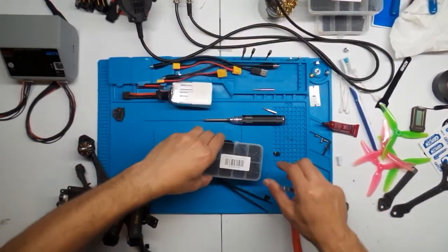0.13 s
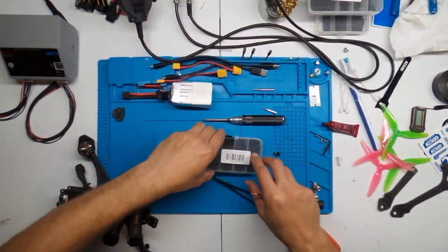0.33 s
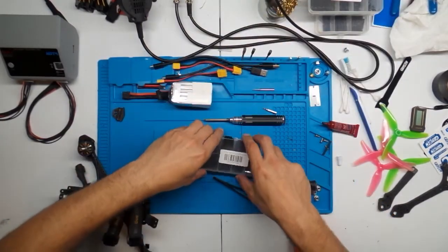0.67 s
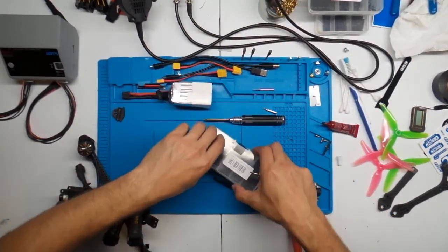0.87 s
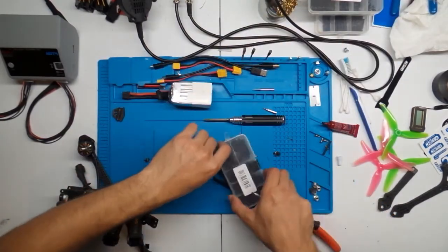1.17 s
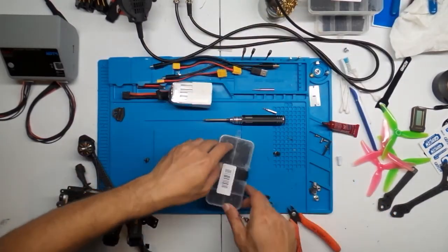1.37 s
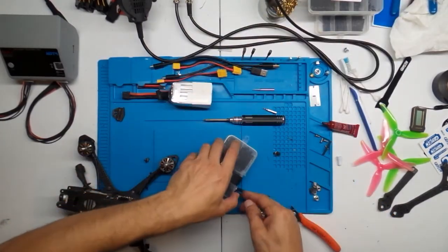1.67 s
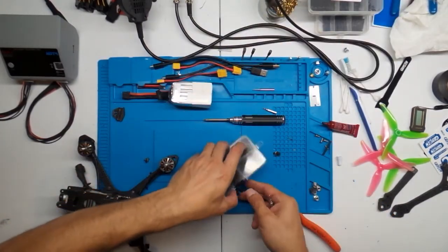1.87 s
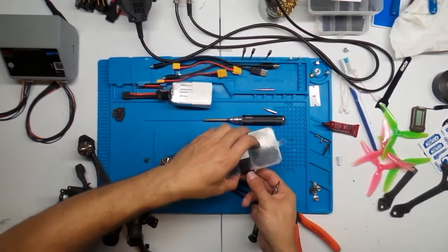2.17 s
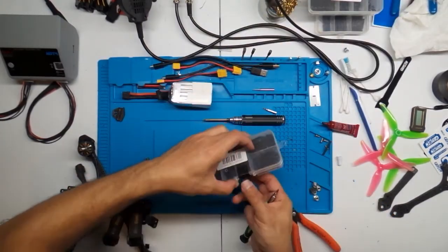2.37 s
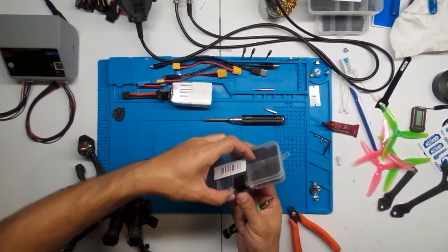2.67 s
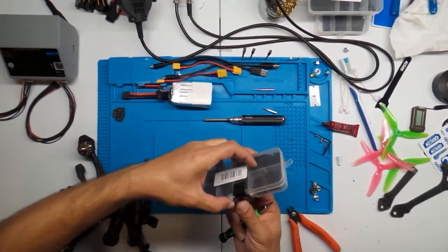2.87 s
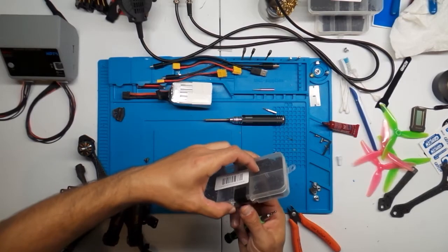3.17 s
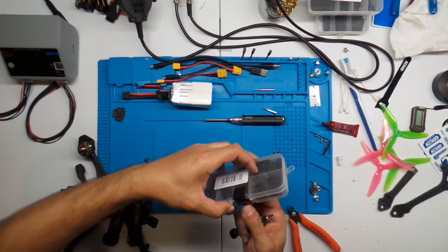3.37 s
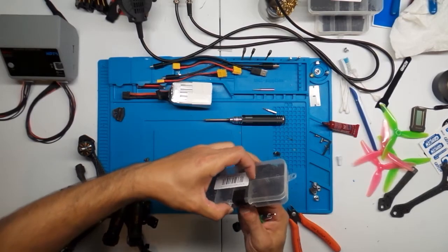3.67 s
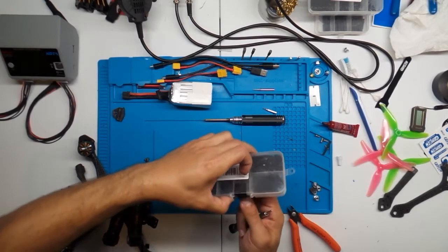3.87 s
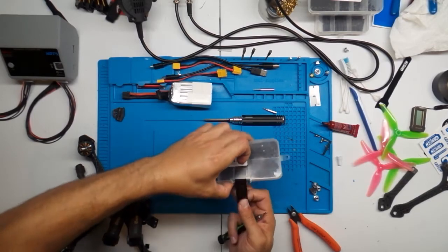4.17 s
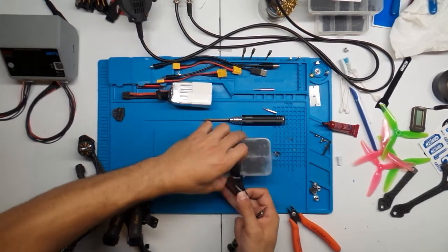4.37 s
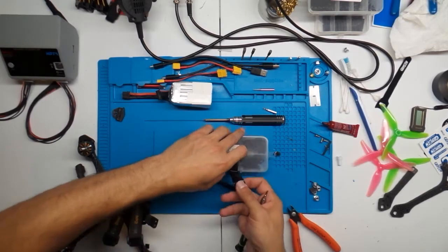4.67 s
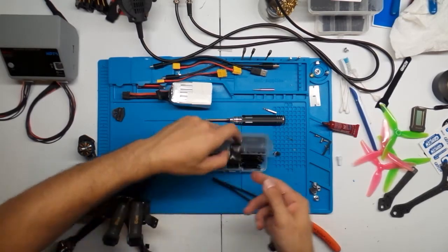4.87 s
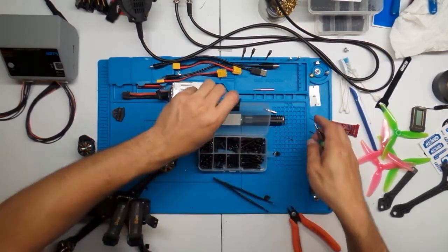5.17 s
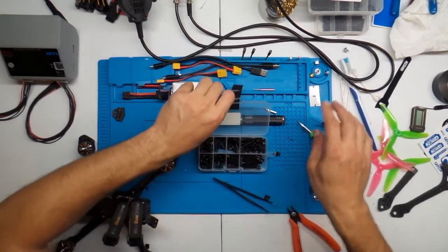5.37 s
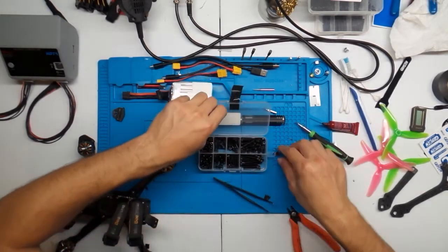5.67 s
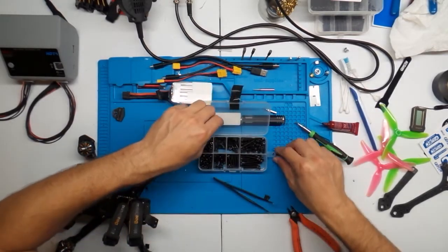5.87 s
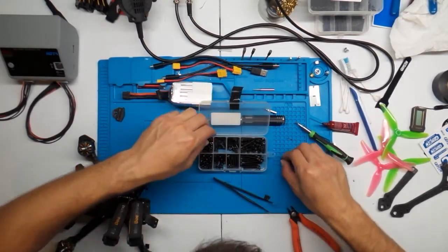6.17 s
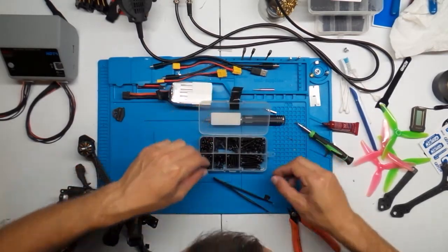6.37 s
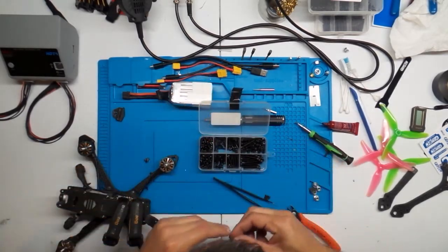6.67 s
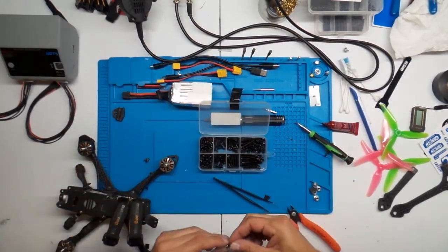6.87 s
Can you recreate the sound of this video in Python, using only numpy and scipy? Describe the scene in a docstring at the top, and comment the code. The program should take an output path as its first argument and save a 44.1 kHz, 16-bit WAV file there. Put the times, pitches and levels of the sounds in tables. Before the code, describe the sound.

Light plastic clicks, screw rattles and soft scrapes, then a hollow pop and a heavy clack as the box lands on the bench, fading to near silence.

```python
"""A click and a dull thud break the hush of a small room: a small plastic compartment box full of screws
is slid and turned on a rubber mat, picked up, unlatched, opened, then dropped onto the workbench.
Each contact is a noise burst or a shower of tiny impacts; it sounds directly and excites the shell's modes.
Landings drive decaying bench modes, stick-slip keeps damped resonances singing, and air pops ring briefly.
Dense decaying noise makes the room's reflections, heard by one microphone above the bench."""
import sys
import numpy as np
from scipy import signal
from scipy.fft import rfft, irfft
from scipy.io import wavfile

SR = 44100
rng = np.random.default_rng(int(sys.argv[2]) if len(sys.argv) > 2 else 0)


def int16_out(signal):
    """Quantize to a 16-bit WAV file."""
    q = np.round(np.clip(np.atleast_2d(signal).T, -1, 1) * 32767)
    wavfile.write(sys.argv[1], SR, q.astype(np.int16))


N = 308859

# Levels of the movements are relative: each source adds its own gain.
# Sharp contacts of shell, latch and lid:
# (time [s], level [dB], treble [dB], frequency of the panel that buzzes [Hz])
CLICKS = [(0.2927, -39.5, -9.5, 2200), (.443, -38.5, -19, 1100), (.4514, -60, 0, 900),
          (1.1917, -44, -7, 2130), (1.2894, -31.5, -29, 1090), (1.626, -56.5, -12, 1490),
          (2.432, -54.5, -0.5, 1500), (2.4912, -47.5, -2, 2800), (2.4976, -40.5, -4, 1630),
          (2.521, -48.5, -2, 3200), (2.7403, -58, 13, 1730), (2.8133, -51, 1, 3200),
          (2.8918, -44.5, 3.5, 1400), (2.9032, -43, 4.5, 2780), (2.9181, -41.5, -12, 1360),
          (2.9875, -53.5, 6, 3380), (3.2968, -70.5, 12.5, 6500), (3.453, -47, 5.5, 6500),
          (3.6099, -60, 8.5, 2200), (3.6214, -41.5, -2.5, 2280), (3.6469, -41, -10, 1670),
          (3.6521, -36, -3.5, 2350), (3.6923, -41, -4, 2400), (4.3614, -60, -12, 2500),
          (4.3925, -41, -18, 830), (4.5276, -37.5, -14, 860), (4.635, -49, -5, 1070),
          (4.7637, -58, 1, 2000), (5.265, -47, -10, 1900), (5.3337, -47, 4, 1400), (5.3643, -23.5, 4, 1300),
          (5.3679, -23.5, 0, 1100), (5.6861, -54.5, -10.5, 1860), (5.7649, -54.5, -13, 1830)]
# Fingers dragging on the plastic and the hinge turning:
# (time [s], swell [s], fade by 20 dB [s], level [dB], frequency of the panel that sings [Hz])
RUBS = [(.384, .002, .09, -60, 1110), (1.063, .015, 0.034, -52.5, 2700), (1.288, 0.0022, 0.05, -52.5, 1100),
        (1.42, 0.023, 0.15, -67, 1960), (1.78, 0.033, 0.088, -71, 1000), (2.25, 0.031, 0.042, -73, 1940),
        (2.401, 0.05, 0.11, -60.5, 1380), (2.52, 0.039, 0.037, -59.5, 5360),
        (2.631, 0.03, 0.063, -71.5, 2770), (2.814, 0.034, 0.097, -50.5, 1050),
        (2.895, 0.023, .04, -48, 1650), (3.645, 0.05, 0.047, -57, 2250), (4.127, 0.0093, 0.079, -49, 800),
        (4.15, 0.045, .045, -50.5, 1760), (4.62, 0.081, 0.13, -64.5, 1070), (4.9, 0.073, 0.12, -71, 436),
        (5.061, 0.031, 0.025, -69, 1790), (5.42, 0.023, 0.16, -49.5, 2360),
        (6.66, 0.043, 0.099, -78.5, 1960)]
# The box pushed or turned on the mat: (time [s], swell [s], fade by 20 dB [s], level [dB])
SLIDES = [(.41, 0.04, 0.039, -50.5), (.754, 0.0026, .1, -60), (1.03, 0.044, 0.2, -58),
          (1.188, 0.089, 0.35, -60)]


def undb(db):
    """Amplitude gain is ten to the power of the level in decibels over twenty."""
    return 10 ** (np.asarray(db) / 20)


def seconds(length):
    """Uniform sampling gives the time axis of a short sound."""
    return np.arange(int(length * SR)) / SR


def on_log(hz, points):
    """Interpolate (frequency, value) points on a logarithmic axis, as pitch is heard."""
    f, value = np.transpose(points)
    return np.interp(np.log(np.maximum(hz, 1)), np.log(f), value)


def add(out, s, sound):
    """Superposition: mix a sound in at time s."""
    i = max(int(s * SR), 0)
    out[i:i + len(sound)] += sound[:N - i]


def through(x, response):
    """A linear system convolves its input with its impulse response."""
    return signal.fftconvolve(x, response)[:N]


def contact(body_db, bright_db, air_db, size=1024):
    """Minimum-phase response of one contact; where the box is touched sets its colour."""
    # General colour of a contact on the box: (frequency [Hz], relative level [dB])
    contact_colour = [(60, -12.5), (250, -1), (500, 0), (720, 7), (1100, 5.5), (2200, 6.5), (3700, 3),
                      (6500, 2), (10000, 0), (13500, 2.5), (16000, -5)]
    hz = np.fft.rfftfreq(size, 1 / SR)
    touch_colour = [(1100, body_db), (1800, 0.0087), (2800, 0),
                    (4200, bright_db), (7000, bright_db), (10000, air_db)]
    db = on_log(hz, contact_colour) + on_log(hz, touch_colour)
    # folding the cepstrum onto positive times makes the response causal
    cepstrum = irfft(np.log(undb(db)))
    cepstrum[1:size // 2] *= 2
    cepstrum[size // 2 + 1:] = 0
    return irfft(np.exp(rfft(cepstrum)))


def ring(modes, length):
    """Modal superposition: free decaying sinusoids, scaled together to unit energy."""
    t = seconds(length)
    y = sum(undb(db - 60 * t / t60) * np.sin(2 * np.pi * hz * t) for hz, db, t60 in modes)
    return y / np.linalg.norm(y)


def grains(count, rate, spread_db):
    """Random impulse train: impacts at a mean rate per second, of spread strength and rms 1."""
    strength_db = spread_db * np.minimum(rng.exponential(size=count), 3)
    size = undb(strength_db) * rng.choice([-1, 1], count)
    y = size * (rng.random(count) < rate / SR)
    return y / (np.std(y) + 1e-9)


def shower(swell, fade, rate, spread_db):
    """Amplitude modulation: small impacts swell as something moves and die out as it rests."""
    t = seconds(.6)
    effort = np.minimum(t / swell, 1) * undb(-20 * np.maximum(t - swell, 0) / fade)
    return effort * grains(len(t), rate, spread_db)


def moves(table, colour, rate, spread_db, db):
    """Source and filter: a shower of contacts for each move, one colour for moves of a kind."""
    out = np.zeros(N)
    for s, swell, fade, level_db, *_ in table:
        add(out, s, undb(level_db + db) * shower(swell, fade, rate, spread_db))
    return through(out, contact(*colour))


def creak(swell, fade, hz, width):
    """Stick-slip excitation: quick slips keep one damped resonance ringing."""
    t = seconds(.03)
    mode = t * np.exp(-4 * width * t) * np.sin(2 * np.pi * hz * t)
    slips = shower(swell, fade, rate=1600, spread_db=3.0)
    return signal.fftconvolve(slips, mode / np.linalg.norm(mode))


def quiet():
    """Stationary shaped noise: low room rumble and microphone hiss."""
    # Spectrum of the still room: (frequency [Hz], relative level [dB])
    quiet_spectrum = [(12, -73), (20, -39.5), (60, 5), (146, 0), (377, -6.5), (485, -6.5), (718, -13.5),
                      (897, -14.5), (1000, -12.5), (1440, -18.5), (1810, -19.5), (2320, -23.5),
                      (4670, -23.5), (6180, -25.5), (16000, -26.5)]
    rms_db = -66.5
    shape = undb(on_log(np.fft.rfftfreq(N, 1 / SR), quiet_spectrum))
    y = irfft(rfft(rng.standard_normal(N)) * shape, N)
    return y * undb(rms_db) / np.std(y)


def room(wet_db, build_s=0.0036):
    """Reverberation: direct sound, then dense reflections decaying at a rate set by frequency."""
    # Decay of the room: (frequency [Hz], t60 [s])
    room_decay = [(100, .5), (500, 0.44), (2000, 0.18), (6000, 0.23), (15000, 0.2)]
    t = seconds(.7)
    noise, hz = rfft(rng.standard_normal(len(t))), np.fft.rfftfreq(len(t), 1 / SR)
    tail = 0
    for band_hz, t60 in room_decay:
        # overlapping bands share the spectrum
        share = on_log(hz, [(f, f == band_hz) for f, _ in room_decay])
        tail = tail + irfft(noise * share, len(t)) * undb(-60 * t / t60)
    tail *= 1 - np.exp(-t / build_s)
    tail *= undb(wet_db) / np.linalg.norm(tail)
    tail[0] += 1  # direct sound
    return tail


def skin():
    """Friction as random micro-impacts: faint rustle and stray shell ticks while the hands are busy."""
    # Span of the handling: (start [s], end [s])
    busy = (0.23, 5.96)
    fade_db_per_s, rustle_db = 22, -75.5
    ticks_per_s, tick_db = 5, -62.5
    t = np.arange(N) / SR
    effort = undb(-fade_db_per_s * np.abs(t - np.clip(t, *busy)))
    rustle = undb(rustle_db) * grains(N, rate=1500, spread_db=0)
    ticks = undb(tick_db) * rng.standard_normal(N) * (rng.random(N) < ticks_per_s / SR)
    return through(effort * (rustle + ticks), contact(0.94, 0, 0))


def slides():
    """Sliding friction: roughness of the rubber mat strikes the moving box many times a second."""
    # Colour of a slide: (hollow body [dB], brightness [dB], air [dB])
    slide_colour = (2.8, -6, -6)
    return moves(SLIDES, slide_colour, rate=830, spread_db=0.0, db=2.5)


def rubs():
    """Sliding friction: dragging fingers and the turning hinge make showers of small contacts."""
    # Colour of a rub: (hollow body [dB], brightness [dB], air [dB])
    rub_colour = (-2, -1.9, -3.5)
    return moves(RUBS, rub_colour, rate=1100, spread_db=-1.1, db=8)


def screws():
    """Granular impact: screws jolted in their compartments strike in showers of uneven strength."""
    # Shifts of the screws: (time [s], swell [s], fade by 20 dB [s], relative level [dB])
    rattles = [(.292, 0.029, 0.041, -54), (.44, 0.056, 0.0095, -40.5), (.86, 0.014, .032, -71.5),
               (1.047, 0.0037, 0.049, -64), (1.188, .005, 0.081, -58), (1.288, 0.015, 0.24, -64),
               (1.42, .018, 0.14, -74), (2.738, 0.0014, 0.064, -56.5), (3.755, 0.0045, 0.32, -66.5),
               (4.128, 0.0067, 0.14, -50.5), (4.356, 0.0051, 0.16, -59), (4.521, 0.0028, 0.1, -56),
               (5.333, 0.002, 0.077, -44), (5.364, .012, 0.082, -35.5), (6.262, 0.014, 0.045, -67.5),
               (6.975, 0.013, .05, -72.5)]
    # Colour of a shift: (hollow body [dB], brightness [dB], air [dB])
    screw_colour = (-0.76, -0.3, -1.5)
    return moves(rattles, screw_colour, rate=3000, spread_db=2.0, db=8.0)


def pops():
    """Cavity resonance: a fingertip leaving the plastic rings the air in the box for a few cycles."""
    # Hollow pops: (time [s], frequency [Hz], level [dB], t60 [s])
    air_pops = [(4.5855, 695, -28, 0.029), (4.601, 698, -33.5, 0.01), (5.924, 437, -47.5, 0.061)]
    out, t = np.zeros(N), seconds(.1)
    for s, hz, db, t60 in air_pops:
        add(out, s, undb(db - 60 * t / t60) * np.sin(2 * np.pi * hz * t))
    return out


def stick_slip():
    """Driven resonance: clicks leave panels buzzing, rubs sing, slides judder, loose parts ring."""
    # Judder of the box on the rubber: (frequency [Hz], width [Hz], level relative to the slide [dB])
    judder = [(71, 88, 6.5), (444, 380, 3.5), (840, 760, 0.5)]
    # Loose screws, latch and swinging lid ringing on:
    # (time [s], swell [s], fade by 20 dB [s], level [dB], frequency [Hz])
    zings = [(1.195, .03, .27, -65, 13650), (1.29, .045, 0.23, -69, 12800), (3.684, .004, 0.049, -49, 7740),
             (5.365, 0.0059, 0.052, -28.5, 2230), (5.5, 0.043, 0.21, -53, 1720)]
    buzz_db, buzz_swell_s, buzz_fade_s, buzz_q = -6.5, 0.0021, 0.035, 4.4  # level relative to the click
    sing_db, sing_q = 3, 2.8  # level relative to the rub
    zing_width_hz = 400
    out = np.zeros(N)
    for s, db, _, hz in CLICKS:
        add(out, s, undb(db + buzz_db) * creak(buzz_swell_s, buzz_fade_s, hz, hz / buzz_q))
    for s, swell, fade, db, hz in RUBS:
        add(out, s, undb(db + sing_db) * creak(swell, fade, hz, hz / sing_q))
    for s, swell, fade, db in SLIDES:
        for hz, width, judder_db in judder:
            add(out, s, undb(db + judder_db) * creak(swell, fade, hz, width))
    for s, swell, fade, db, hz in zings:
        add(out, s, undb(db) * creak(swell, fade, hz, zing_width_hz))
    return out


def rocking(count=3):
    """Energy loss in rebounds: each blow of the rocking box comes sooner, weaker and softer."""
    # The box landing on the bench: (time [s], level [dB], contact time of the first blow [s])
    thuds = [(.287, -50, 0.0012), (.295, -36, 0.0066), (.441, -44, 0.0032), (1.072, -45.5, 0.0031),
             (1.19, -51.5, 0.00077), (1.29, -47, 0.0012), (1.624, -66.5, 0.00098), (1.84, -63.5, .002),
             (4.522, -40, 0.0048), (5.332, -24, 0.0046), (5.347, -28, .003), (5.366, -26.5, 0.0034),
             (5.477, -34, 0.0058)]
    first_rebound_s, shrink, loss_db, soften = .046, .8, 10.5, 1.25
    for s, db, width in thuds:
        for k in range(count):
            yield s, db - k * loss_db, width * soften ** k
            s = s + first_rebound_s * shrink ** k


def bench(dead_db=-7, dead_t60=0.15):
    """Modal excitation: mat-softened blows give a dead thump, varied by spot, and ring the bench."""
    # Bench top and the low room resonances it drives: (frequency [Hz], relative level [dB], t60 [s])
    bench_modes = [(71.6, -19.5, 0.85), (96, 2, 0.25), (126.8, -6, 0.46), (160.5, -2, 0.36),
                   (196.1, -2, 0.23), (241, -4, .12), (288.4, -3.5, 0.15), (333, 4.5, 0.11),
                   (377, -2, 0.25), (478.5, 1.5, .16), (494, -8.5, .24), (602, 12, 0.05)]
    low_hz = 80  # the bench radiates little below this
    out, t, brief = np.zeros(N), seconds(.8), seconds(.1)
    hz, mode_db, t60 = np.transpose(bench_modes)[:, :, None]
    sign = (-1) ** np.arange(len(bench_modes))[:, None]  # neighbouring modes swing opposite ways
    rings = sign * undb(mode_db - 60 * t / t60) * np.sin(2 * np.pi * hz * t)
    for s, db, width in rocking():
        spot = np.exp(.1 * rng.standard_normal((len(bench_modes), 1)))
        thump = undb(dead_db - 60 * brief / dead_t60) * np.sin(2 * np.pi * hz * spot * brief)
        push = undb(db) / (1 + (hz[:, 0] * width) ** 2)  # a long contact reaches only the low modes
        add(out, s, push @ rings)
        add(out, s, push @ thump)
    return signal.sosfilt(signal.butter(2, low_hz, "high", fs=SR, output="sos"), out)


def grip_db(s):
    """Added damping: the hand takes hollow body from clicks while the box is lifted."""
    # Span of the lift: (start [s], end [s])
    held = (2, 3.6)
    damping_db = 4.5
    return damping_db * (held[0] < s < held[1])


def clicks(chatter_t60=0.051, crack_t60=0.0065, chatter=0.24, db=24.0):
    """Impact as a two-rate noise burst: a crack, then milliseconds of chatter, each with its own treble."""
    body_db, air_db = -2, -1  # hollow body; air relative to the click's treble
    out, t = np.zeros(N), seconds(0.013)
    envelope = undb(-60 * t / crack_t60) + chatter * undb(-60 * t / chatter_t60)
    for s, level_db, treble_db, _ in CLICKS:
        force = rng.choice([-1, 1], len(t)) * envelope
        force = force / np.linalg.norm(force)
        colour = contact(body_db - grip_db(s), treble_db, treble_db + air_db)
        add(out, s, undb(level_db + db) * signal.fftconvolve(force, colour))
    return out


def scene():
    """Superposition: every contact sounds directly and rings the shell; room reflections follow."""
    # Plastic shell: (frequency [Hz], relative level [dB], t60 [s])
    shell_modes = [(670, -2.5, 0.11), (845, -9, 0.048), (1000, -20.5, 0.037), (1163, -8, 0.086),
                   (1360, 3, 0.093), (1540, -10, 0.074), (1880, 1.5, 0.1), (2160, -6, 0.17),
                   (2213, -7, 0.25), (2194, 1.5, 0.35), (2770, 2.5, 0.046), (2980, -12.5, 0.066),
                   (3750, -1.5, 0.1156), (4280, -12.5, 0.12), (5640, 9.5, .05), (6934, 8.5, 0.24),
                   (13650, 0.5, .1)]
    touch = clicks() + screws() + rubs() + slides() + skin()
    box = touch + undb(-23.5) * through(touch, ring(shell_modes, 0.22))
    box_in_room = through(box, room(wet_db=-6.5))
    bench_in_room = through(bench(), room(wet_db=-9.0))
    resonances_in_room = through(pops() + stick_slip(), room(wet_db=-10.5))
    return (box_in_room + bench_in_room + resonances_in_room + quiet())[None]


def record(dry):
    """Band limiting: the microphone rolls off the deep bass and the recorder cuts the top."""
    top_hz = 15950
    lean = signal.sosfilt(signal.butter(3, 42, "high", fs=SR, output="sos"), dry)
    return signal.sosfilt(signal.ellip(10, .2, 70, top_hz, fs=SR, output="sos"), lean)


dry = scene()
out = record(dry)
int16_out(out)
```